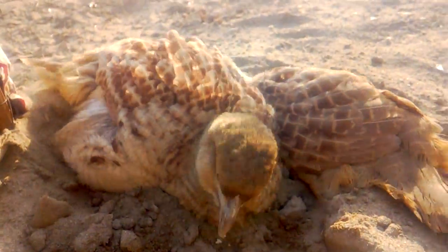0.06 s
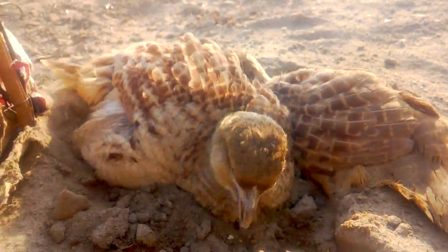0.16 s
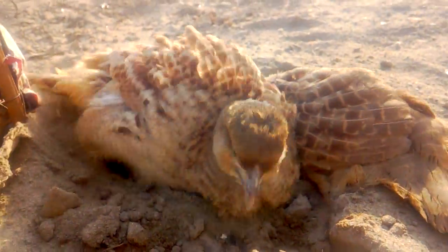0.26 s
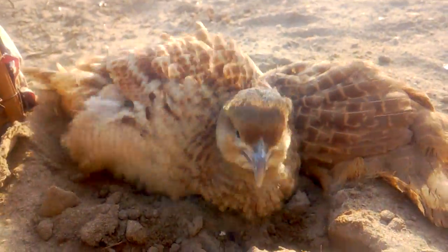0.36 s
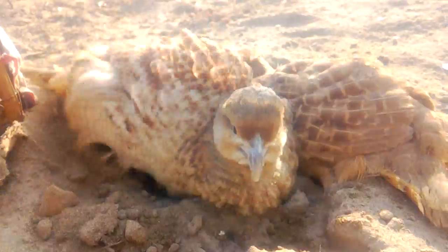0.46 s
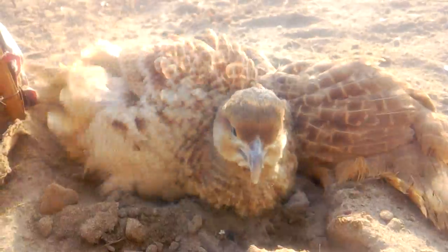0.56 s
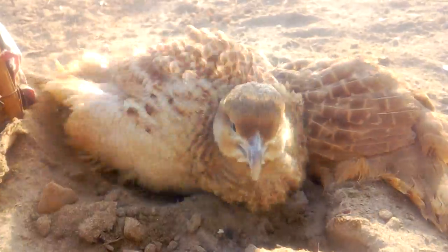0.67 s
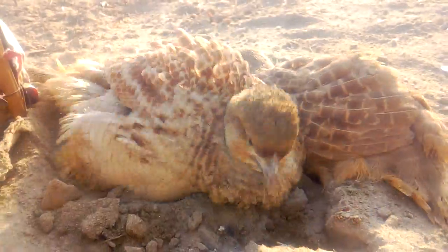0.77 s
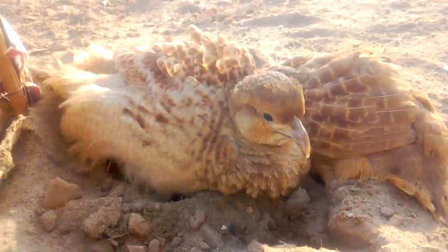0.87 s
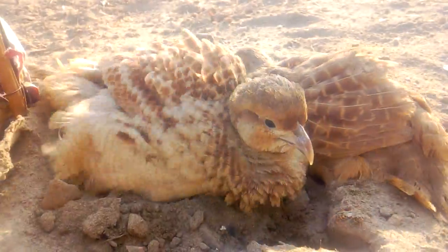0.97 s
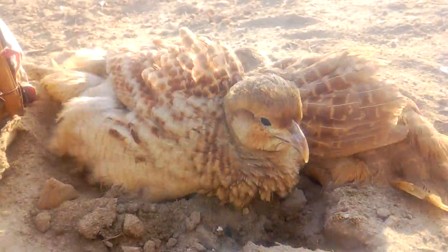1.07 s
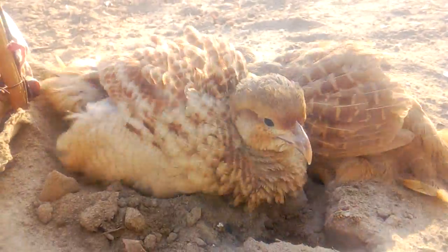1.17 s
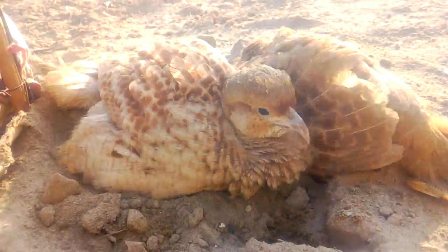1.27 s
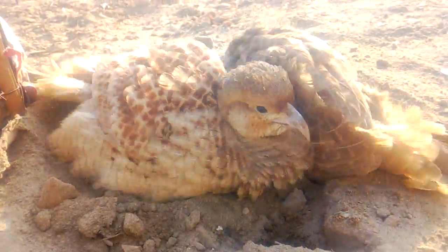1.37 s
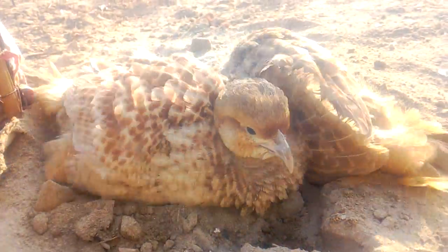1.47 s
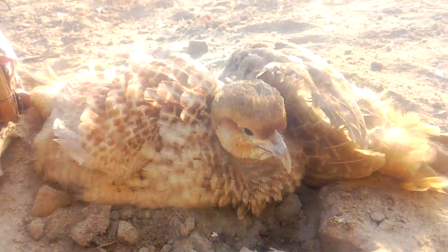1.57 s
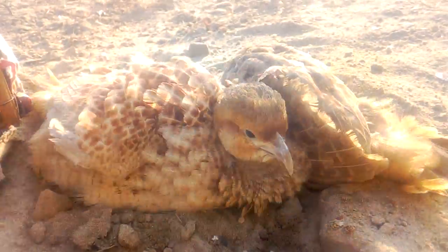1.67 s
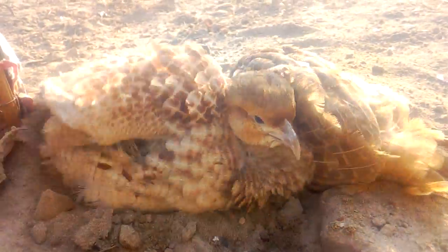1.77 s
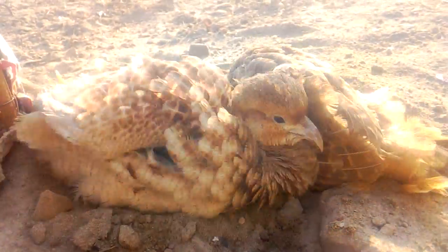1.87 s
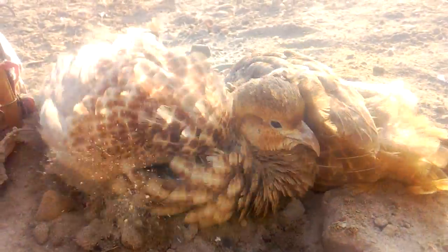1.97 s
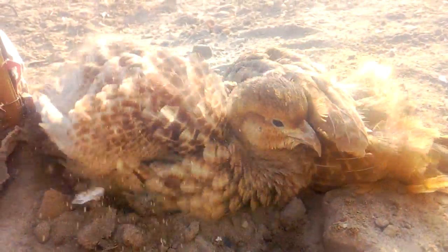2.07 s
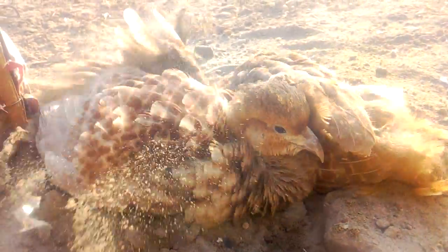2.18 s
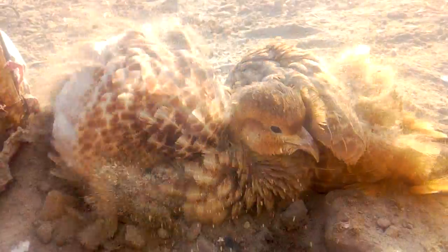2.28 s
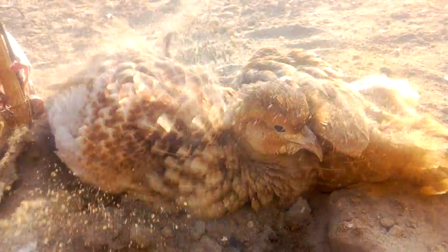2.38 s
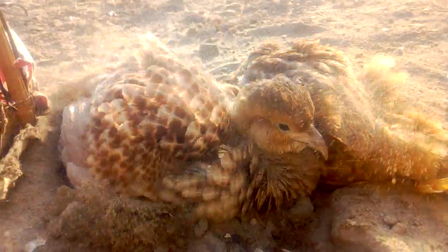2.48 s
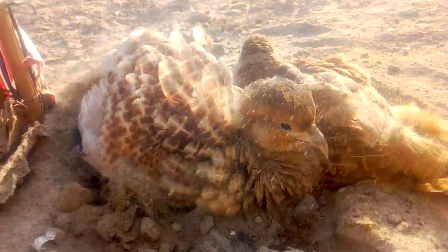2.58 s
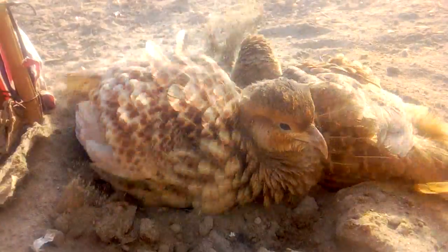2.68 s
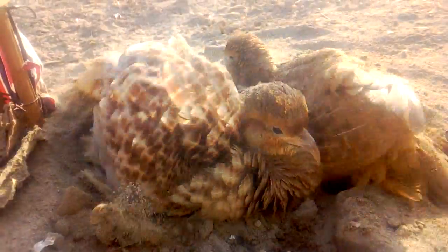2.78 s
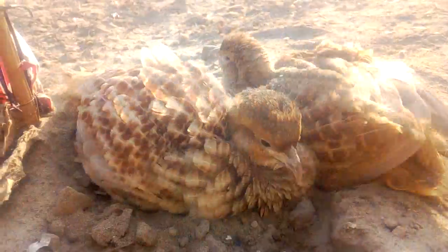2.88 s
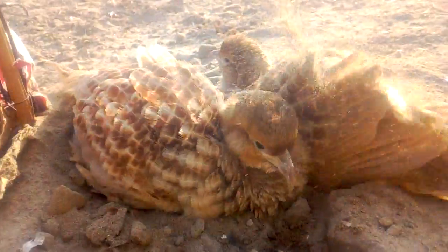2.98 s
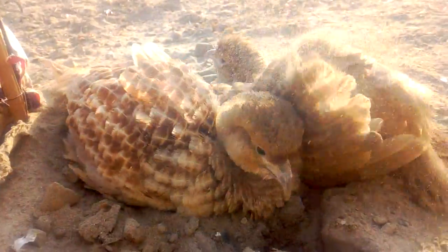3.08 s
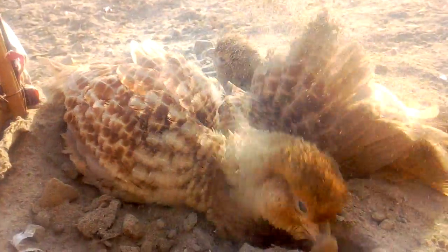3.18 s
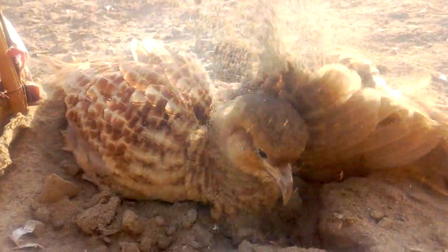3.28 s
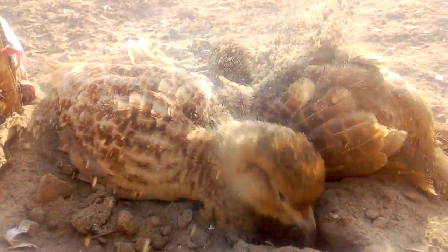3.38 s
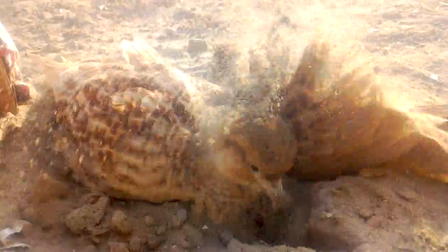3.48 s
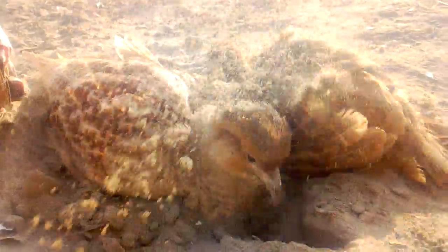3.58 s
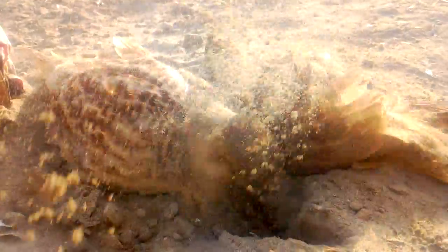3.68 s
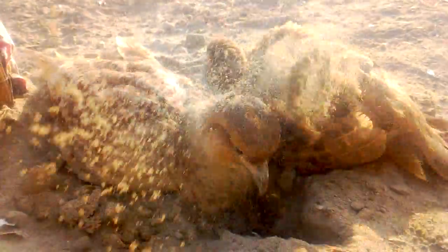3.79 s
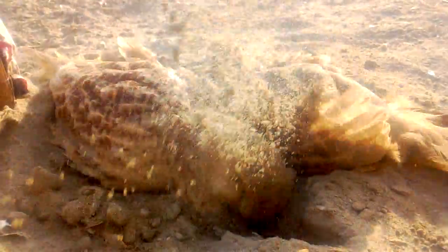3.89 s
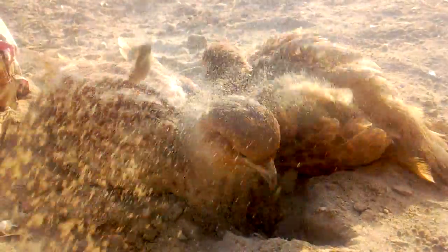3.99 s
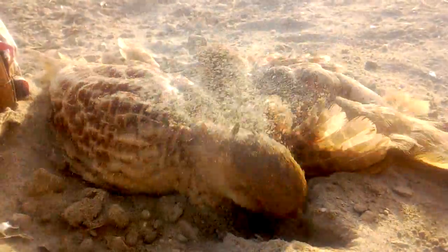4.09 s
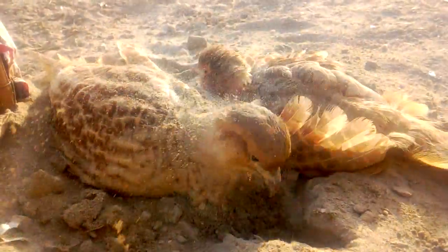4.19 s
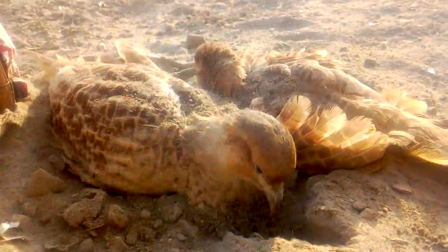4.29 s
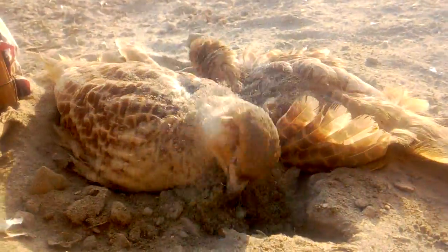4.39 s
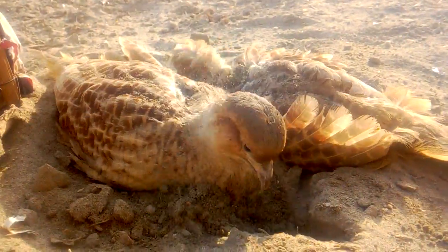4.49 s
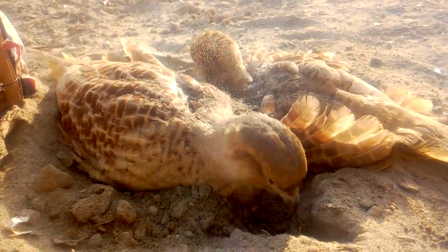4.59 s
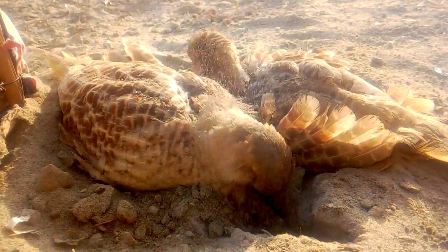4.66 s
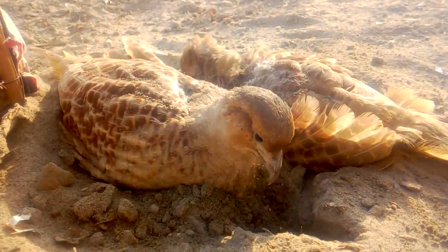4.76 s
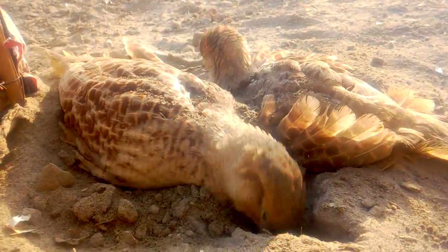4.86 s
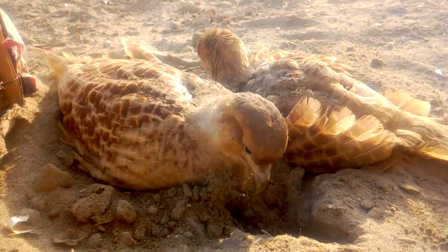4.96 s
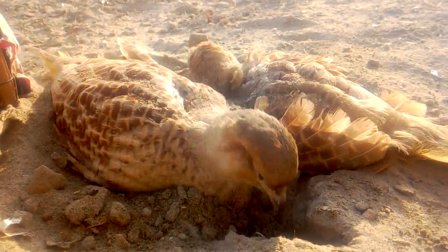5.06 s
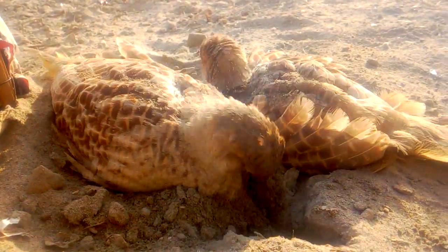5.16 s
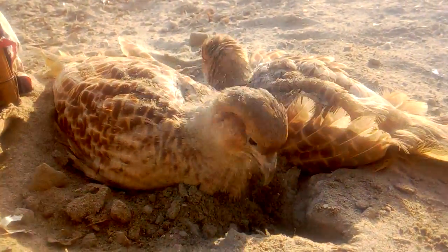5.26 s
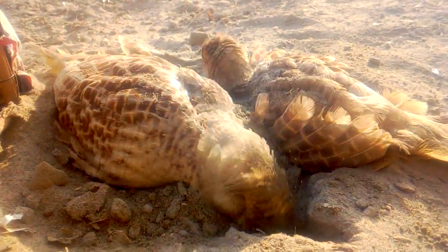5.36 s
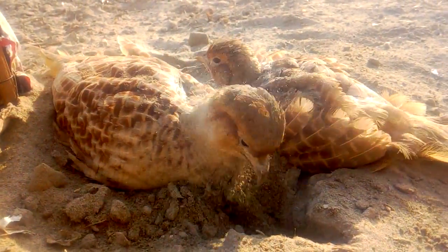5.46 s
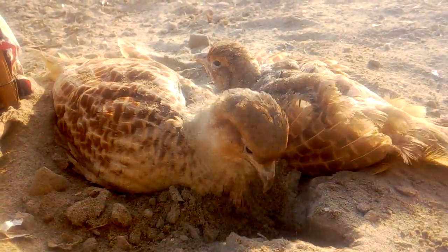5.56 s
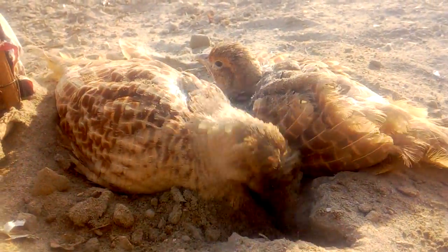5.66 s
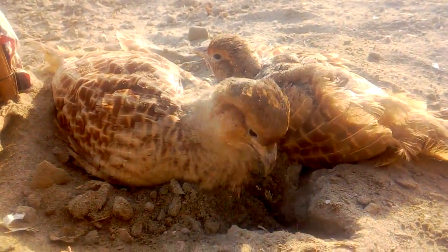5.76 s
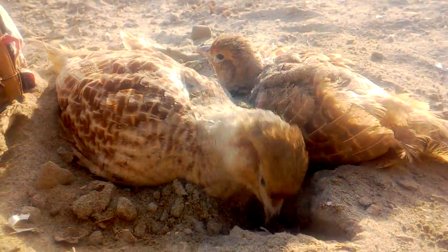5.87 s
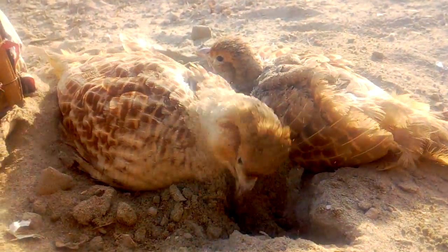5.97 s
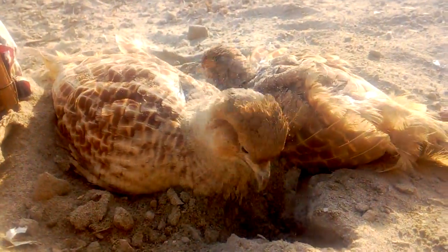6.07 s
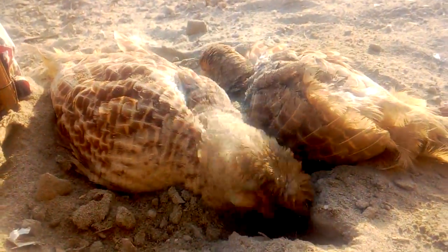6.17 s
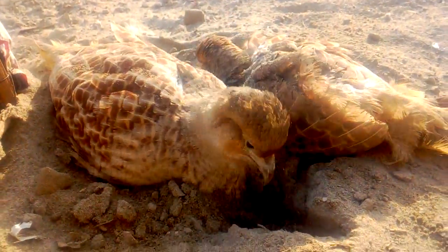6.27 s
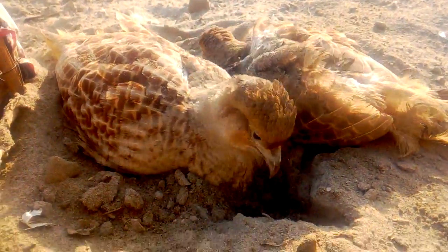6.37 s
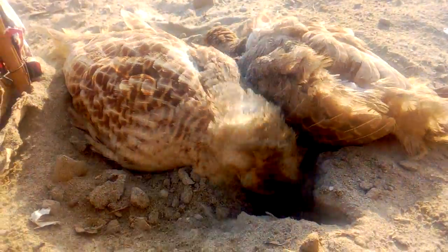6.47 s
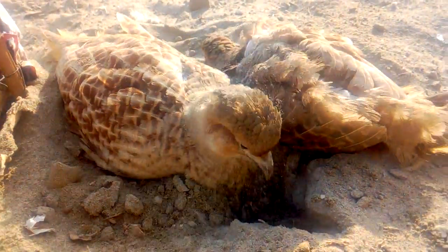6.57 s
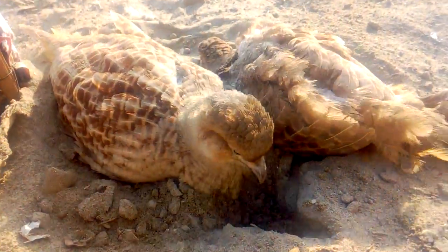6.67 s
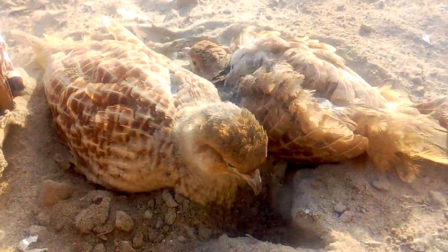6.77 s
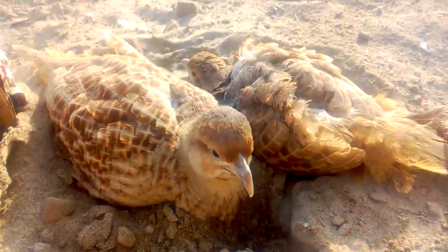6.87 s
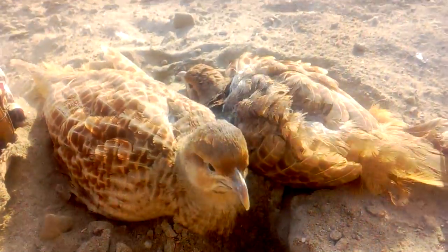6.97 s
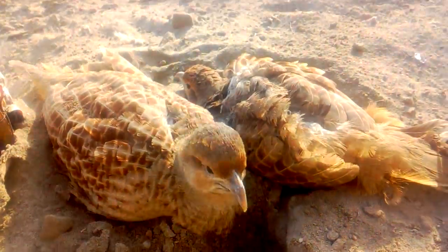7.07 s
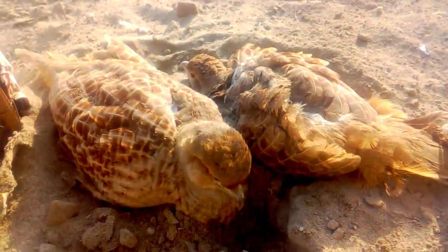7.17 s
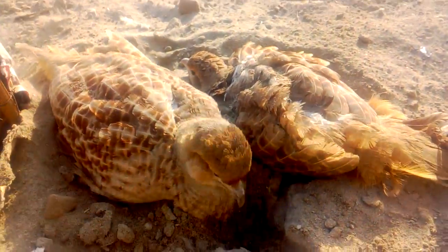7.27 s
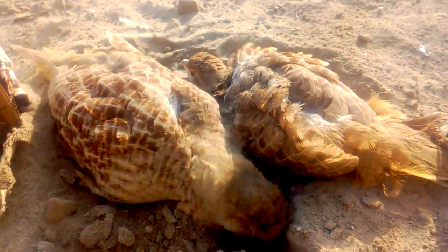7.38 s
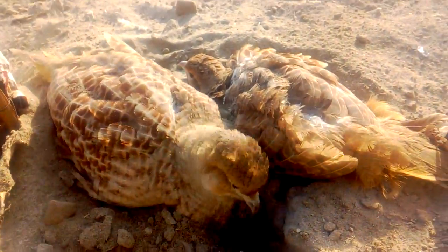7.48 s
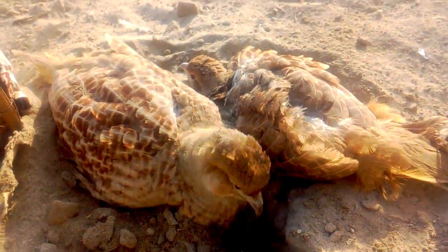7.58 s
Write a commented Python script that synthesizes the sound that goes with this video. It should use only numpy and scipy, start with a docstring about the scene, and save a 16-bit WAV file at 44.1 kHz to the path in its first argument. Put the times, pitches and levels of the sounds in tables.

```python
"""Showers of dry grit run all through: two ground birds bathe in sand close to a small camera.
Wing beats and beak strokes swell a patter of random grain impacts, with plumage rustle and fine dust.
Pebbles ping and ring the microphone port; knocks ring the case in decaying sines with a low boom.
Feathers squeak as shivering overtones, a bird clucks in filtered pulses, and a crow caws far off in
rattling overtones. Low wind rumble and microphone hiss, both shaped noise, lie behind."""
import sys
import numpy as np
from scipy import signal
from scipy.fft import rfft, irfft
from scipy.io import wavfile
from scipy.ndimage import uniform_filter1d

SR = 44100
rng = np.random.default_rng(int(sys.argv[2]) if len(sys.argv) > 2 else 0)


def store_wav(level_fs):
    """Save 16-bit WAV to argv[1]."""
    pcm = np.round(np.clip(np.atleast_2d(level_fs), -1, 1) * 32767)
    wavfile.write(sys.argv[1], SR, pcm.T.astype(np.int16))


N = 336924  # samples

# Wing beats that throw grit close by: [peak t/s, level/dB, swell by 6 dB t/ms]
WING_BEATS = [(0.595, -44.5, 29), (0.668, -50.5, 27), (0.739, -59, 13), (1.205, -47.5, 19),
              (1.241, -48, 12), (1.298, -52.5, 24), (1.349, -54.5, 27), (1.477, -52, 71), (1.644, -56, 76),
              (1.925, -57, 64), (2.055, -52.5, 29), (2.151, -53.5, 61), (2.443, -54.5, 41), (2.52, -55, 55),
              (2.885, -45, 44), (3.082, -43.5, 64), (3.206, -42, 48), (3.341, -33.5, 20), (3.432, -42, 34),
              (3.509, -38, 16), (3.544, -35.5, 10.5), (3.6, -41.5, 30), (3.676, -39.5, 41),
              (3.774, -40, 11.5), (3.869, -40.5, 32), (3.962, -43, 4), (4.107, -46.5, 25),
              (4.418, -58.5, 40), (4.87, -61, 42), (5.472, -57.5, 28), (5.578, -61.5, 26), (6.239, -60, 28),
              (6.387, -36.5, 11.5), (7.243, -51.5, 31)]
# Abrupt beak strokes in the soil, about four a second: [peak t/s, level/dB, fade by 6 dB t/ms]
BEAK_STROKES = [(0.173, -53.5, 14), (0.244, -52, 7), (0.313, -46.5, 11), (0.389, -50, 9.5), (0.472, -51, 8),
                (0.553, -58, 20), (0.835, -45, 6.5), (0.884, -56, 6), (0.971, -50.5, 13),
                (4.002, -40.5, -6), (4.229, -43.5, 36), (4.467, -53.5, 32), (4.753, -51.5, 38),
                (4.997, -52, 47), (5.167, -62, 51), (5.259, -48, 27), (5.318, -56.5, 17), (5.427, -66, 21),
                (5.516, -51.5, 33), (5.783, -48, 20), (5.838, -48.5, 3), (5.86, -53, 19), (6.051, -45, 32),
                (6.312, -51, 39), (6.399, -48.5, 15), (6.589, -52.5, 38), (6.635, -59, 11), (7.21, -68, 14),
                (7.526, -47.5, 22), (7.58, -60, 33)]
STROKE_SWELL_MS, WING_FADE = 5.5, 0.68  # a wing beat fades in this share of its swell
# Falling and stirred sand between the throws: [t/s, steady patter level/dB, plumage rustle level/dB]
SAND = [(0.0, -65, -74.5), (.55, -57, -67.5), (1.0, -59, -68), (1.9, -62.5, -67.5), (2.26, -49, -68.5),
        (2.64, -52.5, -72.5), (2.82, -55.5, -72.5), (3.0, -47, -64), (3.25, -43.5, -61.5),
        (3.74, -45.5, -79), (4.09, -47.5, -97), (4.53, -63, -74), (5.2, -79, -79), (5.96, -65, -69.5),
        (6.41, -67, -62), (6.66, -62.5, -78.5), (7.06, -72, -76.5), (7.64, -71.5, -75.5)]
# Soft grains only ring the port, hard ones click across the whole band: [t/s, softness 0-1]
SOFTNESS = [(0.0, 0.32), (1.9, 0.44), (2.3, 0.22), (3.0, 0.4), (4.4, 0.31), (5.5, 0.59), (6.1, .5),
            (6.4, 0.22), (7.64, .2)]
# Finest dust near the microphone, thick during the big shake: [t/s, level against the grit/dB]
DUST = [(0.0, -31), (1.9, -26), (2.89, -58), (3.0, -20.5), (3.74, -23.5), (3.9, -66), (4.5, -33),
        (7.64, -35.5)]
# Colour of dust and of plumage rustle, before levelling: [f/Hz, level/dB]
DUST_COLOUR = [(5500, -56.5), (7200, 6.5), (8500, -9.5), (10500, -7.5), (13300, -26.5), (15000, -13.0)]
RUSTLE_COLOUR = [(150, -8.5), (350, 4.5), (900, 2.5), (1600, 0), (2600, -3.5), (5000, -44)]
RUSTLE_LUMPS_DB = 2.6  # depth of each of the two drifts in the rustle
THROW_RUSTLE_DB = -27.5  # plumage rustle that comes with each throw of grit, against the grit

# The microphone port rings near 3.8 kHz and shuts out the top: [f/Hz, level/dB]
PORT = [(150, -29), (300, -7.5), (870, -6), (1500, -1), (2000, 0), (2400, 5), (2900, 9), (3750, 15.5),
        (4370, 15), (5160, 5), (6300, 5), (7500, -13), (8500, -25), (10000, -22.5), (13700, -38),
        (14700, -26.5), (15600, -30)]
# Single pebbles landing: [t/s, ping level/dB, f/Hz, contact t/ms]
PEBBLES = [(0.1746, -27, 3960, 0.59), (0.2429, -24, 3870, 0.8), (0.306, -37, 3980, 1.6),
           (0.3113, -26.5, 3970, 0.79), (0.3149, -22.5, 3240, 0.22), (0.3243, -36, 3800, 0.24),
           (0.3424, -28.5, 4470, 0.36), (0.3875, -32, 3880, 0.92), (0.3905, -39, 3630, .59),
           (0.5496, -31.5, 3800, 0.72), (0.5951, -28.5, 3900, 1.9), (0.8323, -27, 3840, 0.74),
           (0.957, -34.5, 3510, .44), (1.0657, -38, 3800, .45), (1.1893, -38, 3580, .7),
           (1.199, -34, 3120, 0.56), (1.451, -32.5, 3220, 0.34), (1.6665, -38.5, 3230, 0.38),
           (2.2066, -29.5, 3700, 0.39), (2.2438, -33, 3760, 0.43), (2.84, -24.5, 3720, 0.58),
           (2.87, -32, 3400, 0.17), (3.0833, -28.5, 3570, .8), (3.3215, -34, 3700, 1.0),
           (3.3283, -22.5, 3470, 0.71), (3.3395, -24, 3260, 0.52), (3.5435, -24, 3560, 1.0),
           (3.547, -21.5, 3370, 0.69), (3.9999, -27.5, 3600, 0.9), (4.1961, -32, 3870, .71),
           (4.2281, -24.5, 3940, 0.76), (4.2328, -29, 3800, 1), (4.4636, -29.5, 3340, 0.38),
           (4.753, -33.5, 3740, 0.82), (4.7672, -38, 3170, 0.55), (4.997, -34, 3720, 1.5),
           (5.2574, -32, 3980, 0.89), (5.2715, -41, 3650, 0.52), (5.424, -48, 3970, 3.0),
           (5.514, -37, 3840, 1.1), (5.5233, -37.5, 3590, 1.9), (5.781, -34.5, 3820, 1.1),
           (5.861, -27, 3220, 0.49), (5.8982, -38, 4800, 0.29), (5.907, -38, 4660, .35),
           (6.0487, -34, 4000, 1.0), (6.0567, -28, 3870, 0.72), (6.0827, -30, 3050, 0.27),
           (6.2187, -40, 3180, .22), (6.2399, -35, 3300, 0.25), (6.3119, -32.5, 3900, .7),
           (6.3443, -38, 4000, .26), (6.357, -31.5, 3480, 0.16), (6.3762, -40, 4500, 0.24),
           (6.385, -16.5, 4460, 0.27), (6.3867, -9, 4830, .2), (6.401, -28, 4090, 0.33),
           (6.5836, -33.5, 4250, 0.77), (6.5943, -35.5, 3900, .9), (6.8055, -48, 4130, .7),
           (7.2023, -44.5, 3670, .36), (7.2196, -40, 4120, 0.47), (7.5223, -31.5, 4200, 0.71),
           (7.5261, -22.5, 4020, 0.44), (7.5308, -32, 3360, 0.85), (7.541, -39, 3520, 1.2)]
# Pebbles after a stroke: longest delay, loudest level over the stroke, middle pitch
SCATTER_S, SCATTER_DB, SCATTER_HZ = 0.037, 1, 3890
CRACK_HZ, CRACK_DB, CRACK_T60 = 15000, -41, .003  # second, faint ring of the port, for a contact of 1 ms

# Knocks that reach the camera case: [t/s, level/dB, f/Hz]
KNOCKS = [(0.3151, -37.5, 940), (0.473, -53, 1300), (0.5491, -49, 1400), (0.5843, -45, 1310),
          (0.612, -43, 875), (0.8322, -42, 1440), (0.9718, -42, 920), (1.1899, -44.5, 1430),
          (1.2062, -39.5, 1320), (1.448, -45.5, 875), (2.206, -50, 597), (2.8404, -40, 1660),
          (3.49, -45, 725), (3.5409, -56, 1000), (4.255, -50, 900), (4.2693, -46.5, 1080),
          (4.405, -46, 990), (5.1706, -47.5, 1060), (5.26, -49.5, 1230), (5.8461, -37.5, 1120),
          (5.861, -30.5, 990), (5.9279, -41.5, 570), (5.9359, -44.5, 950), (5.948, -38.5, 484),
          (6.0814, -41, 930), (6.2185, -49, 1120), (6.2401, -49, 800), (6.2942, -49.5, 980),
          (6.377, -33, 870), (6.385, -10.5, 685), (6.4033, -34, 728), (6.601, -53, 1030),
          (6.6168, -50, 1200)]
# Ringing modes of the case: [multiple of the knock's pitch, level/dB, t60/s]
CASE = [(1.0, 4.5, 0.0061), (.45, -15.5, 0.016), (2.4, -30, 0.0027)]
BOOM_HZ, BOOM_T60, BOOM_DB = 104, .06, -7  # level against the knock
# Faint random knocks while feet scrape near the case: loudest level, base pitch, from and to in seconds
SCUFFLE_DB, SCUFFLE_HZ, SCUFFLE_S = -55, 540, (5.85, 6.36)

# Feather squeaks, one table each:
# [t/s, f/Hz, fundamental level before colour/dB, overtone slope/(dB per octave)]
SQUEAKS = [
    [(.404, 1830, -52, -11), (.415, 1806, -55.5, -9), (.421, 1428, -53.5, -2.5), (.432, 1478, -48, -2.5),
     (.445, 1370, -43, -2), (.450, 1530, -48, -1.5), (.464, 1517, -45.5, -5), (.472, 1360, -55, 3)],
    [(0.684, 1646, -59, -21), (0.697, 1966, -59.5, -12), (0.699, 2006, -63, -7), (0.706, 1966, -61, -12)],
    [(1.455, 1686, -58, -20), (1.471, 1930, -61, -11), (1.491, 1900, -62, -17), (1.505, 2299, -66, -14)],
    [(2.253, 1950, -58, -10), (2.261, 1874, -58.5, -5.5), (2.279, 1751, -53, -9), (2.288, 1760, -60, -1)],
    [(7.249, 1565, -60, -3), (7.259, 1736, -62, 4), (7.268, 1705, -61.5, 2), (7.276, 1305, -51, -3),
     (7.292, 1213, -51, -7), (7.306, 1480, -55, -2.5)],
]
# How the squeak is coloured on its way to the microphone: [f/Hz, level/dB]
SQUEAK_BODY = [(700, -27), (1300, -2.5), (1900, 4.5), (2600, 0.5), (3100, 11), (3700, 20), (4200, 19.5),
               (4600, 5.5), (5300, 0.5), (6100, 6.5), (7000, -39), (9000, -40)]

# A soft cluck: [t/s, pulse rate f/Hz, level/dB]
CLUCK = [(6.838, 334, -45), (6.841, 322, -40), (6.852, 289, -38), (6.857, 285, -41)]
# The closed throat of the cluck: [f/Hz, level/dB]
CLUCK_THROAT = [(150, -30), (320, -2), (640, -1), (950, 1), (1300, 0.5), (1600, -31), (2500, -13),
                (3500, -47)]

# Caws far off: [start t/s, length t/s, effort level/dB, top f/Hz, beak opening as a factor on the throat,
# rise t/s, roughness 0-1, loss of the overtones under 1.4 kHz/(dB per octave)]
CAWS = [(4.268, .262, -48.5, 476, 0.97, 0.02, 0.24, -0.5), (7.565, 0.29, -46.5, 491, 0.92, 0.041, 0.4, 17)]
# The crow's throat: [f/Hz, level/dB]
CROW_THROAT = [(450, -24), (930, -5), (1400, -4.5), (1650, 0), (1850, 5), (2300, 13.5), (2800, -12),
               (3300, -18), (4200, -5.5)]
CAW_SAG, CAW_LEAN = .13, .72  # share of the pitch lost at both ends; under 1 the top comes early
CAW_DROP, CAW_DROP_S = .12, 0.0153  # the pitch breaks downward as the caw ends: share, time
CAW_EDGE_DB, CAW_FALL_S = -13, 0.031  # level lost at both ends, time of the fall
ECHO_DB, ECHO_T60 = -9, 0.13  # the calls come back from the ground and walls nearby

# Low wind rumble, before its lumps: [t/s, level/dB]
GUSTS = [(0.0, -69), (.35, -58), (1.1, -63), (1.4, -57.5), (2.8, -60), (3.35, -57), (4.3, -60.5),
         (5.5, -60.5), (5.6, -57), (5.8, -65.5), (6.0, -55.5), (6.4, -56), (6.6, -61), (7.1, -63),
         (7.25, -58.5), (7.64, -60)]
# Colour of the rumble, before levelling: [f/Hz, level/dB]
RUMBLE = [(15, -36.5), (30, -5), (60, 2.5), (95, -1.5), (170, -9.5), (240, -17.5), (350, -27.5), (700, -48)]
# Colour of the microphone hiss, before levelling: [f/Hz, level/dB]
HISS = [(300, -5.5), (2000, -16), (3800, -17), (5200, -5.5), (7000, -14.5), (9000, -30), (13800, -24.5),
        (14800, -12), (15600, -16)]
HISS_DB, EDGE_HZ = -74, 15700  # hiss level; top of the microphone's band


def sand():
    """Grains hit in clumps that swell with wing and beak; plumage rustles below, dust shares the impacts."""
    s, *levels = np.transpose(SAND)
    t = np.arange(N) / SR
    patter, rustle = (gain_of(np.interp(t, s, db)) for db in levels)
    dust = gain_of(np.interp(t, *np.transpose(DUST)))
    amplitude = np.sqrt(patter ** 2 + throws())

    clumps_db = 2.0 * drift(0.0042) + 0.13 * drift(0.032)
    hits = grains(N, per_s=5000, spread_db=-0.5) * gain_of(clumps_db)
    hard = through_port(amplitude * hits, PORT)
    gentle = through_port(amplitude * hits, [(hz, 2.14 * db) for hz, db in PORT])
    softness = np.clip(np.interp(t, *np.transpose(SOFTNESS)), 0, 1)
    grit = (1 - softness) * hard + softness * gentle

    lumps_db = RUSTLE_LUMPS_DB * (drift(0.021) + drift(0.038))
    rub = grains(N, per_s=1500, spread_db=0.5) * gain_of(lumps_db)
    plumage = evened(shaped(rub, RUSTLE_COLOUR))
    rustle_level = np.sqrt(rustle ** 2 + throws() * gain_of(THROW_RUSTLE_DB) ** 2
                           + (patter * gain_of(THROW_RUSTLE_DB)) ** 2)

    puffs = gain_of(1.0 * drift(.015))  # dust arrives in puffs
    spray = dust * amplitude * evened(shaped(hits, DUST_COLOUR)) * puffs
    return patchy(grit + rustle_level * plumage + spray, patchy_db=1.0)


def throws():
    """Power of the thrown grit: a quick swell at each wing beat or stroke, then stragglers keep falling."""
    power, ms = np.zeros(N), np.arange(-.15, .35, 1 / SR) * 1000
    rows = [(s, db, swell_ms, WING_FADE * swell_ms) for s, db, swell_ms in WING_BEATS]
    rows += [(s, db, STROKE_SWELL_MS, fade_ms) for s, db, fade_ms in BEAK_STROKES]
    for peak_s, db, swell_ms, fade_ms in rows:
        swell = 2 ** -(ms / swell_ms) ** 2
        fade = 1 / (1 + (ms / fade_ms) ** 2)
        add(power, peak_s - .15, gain_of(db) ** 2 * np.where(ms < 0, swell, fade) ** 2)
    return power


def grains(length, per_s, spread_db):
    """Impacts of sand grains: random moments, signs and sizes, at rms 1."""
    size = gain_of(spread_db * np.minimum(rng.exponential(1, length), 4))
    sign = rng.choice([-1., 1.], length)
    return evened(size * sign * (rng.random(length) < per_s / SR))


def through_port(x, points):
    """Rings the microphone port with x, through a response of unit energy."""
    ring = causal(points)
    return signal.oaconvolve(x, ring / np.linalg.norm(ring))[:N]


def patchy(x, patchy_db):
    """Colour drifts in patches of about 700 Hz by 60 ms as the sand comes from different places."""
    z = signal.stft(x, nperseg=256, noverlap=192)[2]
    field = uniform_filter1d(rng.standard_normal(z.shape[::-1]), size=40, axis=0)
    field = evened(uniform_filter1d(field, size=4, axis=1))
    return signal.istft(z * gain_of(patchy_db * field).T, nperseg=256, noverlap=192)[1][:N]


def pebbles():
    """Each pebble gives a short ping; the briefer the contact, the harder the edge that rings the port."""
    out, lead = np.zeros(N), 100  # samples before the peak
    t, port = np.arange(-lead, 300) / SR, causal(PORT)[:300]
    after = t[lead:]
    crack = np.sin(2 * np.pi * CRACK_HZ * after) * gain_of(CRACK_DB - 60 * after / CRACK_T60)
    edge = 0.04 * port / abs(port).max() + crack
    for s, db, hz, ms in [*PEBBLES, *scattered()]:
        width = np.clip(ms, .2, 3) / 1000
        steepness = np.where(t < 0, 2.6, 1.6)
        ping = np.cos(2 * np.pi * hz * t) * 2 ** -(steepness * t / width) ** 2
        ping[lead:] += edge / ms
        add(out, s - lead / SR, -gain_of(db) * ping)
    return out


def scattered():
    """Three small pebbles fall just after the peak of each beak stroke, as rows like the single ones."""
    late, size, pitch, length = rng.random((len(BEAK_STROKES), 3, 4)).T
    s, db, _ = np.transpose(BEAK_STROKES)
    rows = [s + SCATTER_S * late ** 1.7, db + SCATTER_DB - 11.0 * size,
            SCATTER_HZ * (1 + .16 * (pitch - .5)), 1.1 + .8 * length]
    return np.reshape(rows, (4, -1)).T


def knocks():
    """The case rings briefly, then recoils with a low boom."""
    out, t = np.zeros(N), np.arange(5000) / SR
    boom = -np.sin(2 * np.pi * BOOM_HZ * t) * gain_of(BOOM_DB - 60 * t / BOOM_T60)
    for s, db, hz in [*KNOCKS, *scuffle()]:
        ring = sum(gain_of(mode_db - 60 * t / t60) * np.sin(2 * np.pi * multiple * hz * t)
                   for multiple, mode_db, t60 in CASE)
        ring = ring * (1 - np.exp(-t / .00008))  # the blow takes a moment to build
        add(out, s, gain_of(db) * (ring + boom))
    return out


def scuffle(count=30):
    """Faint knocks at random moments, as rows like the single ones."""
    late, size, pitch = rng.random((count, 3)).T
    start, end = SCUFFLE_S
    return np.transpose([start + (end - start) * late, SCUFFLE_DB - 8.0 * size,
                         SCUFFLE_HZ * (.55 + .9 * pitch)])


def squeak(rows, rough=0.11, rasp_db=-13):
    """A stick-slip tone: the pitch shivers, each overtone flutters and rasp fills the gaps."""
    s, *columns = np.transpose(rows)
    t = np.arange(s[0], s[-1], 1 / SR)
    hz, db, slope_db = (np.interp(t, s, c) for c in columns)
    shiver = evened(signal.fftconvolve(rng.standard_normal((5, len(t))), np.hanning(90)[None], "same"))
    turns = np.cumsum(hz * (1 + .009 * shiver[0])) / SR
    tone = 0
    for k in range(1, 5):
        overtone_gain = gain_of(slope_db * np.log2(k) + read(SQUEAK_BODY, k * hz))
        swing = np.sin(2 * np.pi * (k * turns + rng.random()))
        tone = tone + overtone_gain * (1 + rough * shiver[k]) * swing
    rasp = evened(shaped(rng.standard_normal(len(t)), SQUEAK_BODY)) * np.std(tone)
    sound = np.sqrt(2) * gain_of(db) * (tone + gain_of(rasp_db) * rasp)
    return s[0], sound * signal.windows.tukey(len(t), .25)


def cluck():
    """A few pulses through a closed throat that passes mainly the low overtones."""
    s, rate_hz, db = np.transpose(CLUCK)
    t = np.arange(s[0], s[-1], 1 / SR)
    turns = np.cumsum(np.interp(t, s, rate_hz)) / SR
    pulses = np.diff(np.floor(turns + 0.72), prepend=0)
    ring = causal(CLUCK_THROAT)
    return s[0], np.convolve(pulses * gain_of(np.interp(t, s, db)), ring / abs(ring).max())


def caw(start, length, top_db, top_hz, beak, rise_s, rough, thin_db, rattle_hz=72, depth=0.051):
    """A harsh voice on an arch of pitch: it rattles quickly and breath noise blurs each overtone."""
    t = np.arange(0, length, 1 / SR)
    arch = np.sin(np.pi * (t / length) ** CAW_LEAN) ** .8
    drop = CAW_DROP * np.exp((t - length) / CAW_DROP_S)
    hz = top_hz * (1 - CAW_SAG * (1 - arch) - drop)
    effort_db = top_db + CAW_EDGE_DB * (np.exp(-t / rise_s) + np.exp((t - length) / CAW_FALL_S))
    wobble = evened(signal.fftconvolve(rng.standard_normal((10, len(t))), np.hanning(300)[None], "same"))
    rattle = np.sin(2 * np.pi * rattle_hz * t + .5 * uniform_filter1d(wobble[0], size=600))
    rattle = rattle + 0.37 * (2 * rattle ** 2 - 1)  # each swing lingers low and flicks high
    turns = np.cumsum(hz * (1 + depth * rattle)) / SR
    voice = 0
    for k in range(1, 10):
        thinning_db = thin_db * np.minimum(np.log2(k * hz / 1400), 0)
        overtone_gain = gain_of(read(CROW_THROAT, k * hz / beak) + thinning_db)
        voice = voice + overtone_gain * (1 + rough * wobble[k]) * np.cos(2 * np.pi * k * turns)
    return start, gain_of(effort_db) * evened(voice) * signal.windows.tukey(len(t), .06)


def echoed(start, sound):
    """Adds a short diffuse tail of decaying noise to a call."""
    t = np.arange(0, .2, 1 / SR)
    tail = rng.standard_normal(len(t)) * gain_of(-60 * t / ECHO_T60) * (t > .004)
    wet = signal.fftconvolve(sound, gain_of(ECHO_DB) * tail / np.linalg.norm(tail))
    return start, wet + np.pad(sound, (0, len(t) - 1))


def background():
    """A lumpy low rumble of wind, and the steady hiss of the microphone."""
    gusts_db = np.interp(np.arange(N) / SR, *np.transpose(GUSTS))
    gusts_db = gusts_db + 2.0 * drift(0.06) + 2.2 * drift(0.065)
    rumble = evened(shaped(rng.standard_normal(N), RUMBLE)) * gain_of(gusts_db)
    return rumble + gain_of(HISS_DB) * evened(shaped(rng.standard_normal(N), HISS))


def gain_of(db):
    """Decibels to gain."""
    return 10 ** (np.asarray(db) / 20)


def evened(x):
    """Scales to rms 1."""
    return x / np.sqrt(np.mean(x ** 2) + 1e-20)


def read(points, hz):
    """A spectrum table at the frequencies hz."""
    f, value = np.transpose(points)
    return np.interp(np.log(hz + 1), np.log(f + 1), value)


def add(mix, s, sound):
    """Mixes a sound in at s seconds."""
    part = mix[round(s * SR):][:len(sound)]
    part += sound[:len(part)]


def causal(points):
    """Minimum-phase impulse response of a spectrum table."""
    log_gain = np.log(gain_of(read(points, abs(np.fft.fftfreq(4096, 1 / SR)))))
    return np.fft.ifft(np.exp(np.conj(signal.hilbert(log_gain)))).real[:2048]


def shaped(x, points):
    """Filters x by a spectrum table."""
    return irfft(rfft(x) * gain_of(read(points, np.fft.rfftfreq(len(x), 1 / SR))), len(x))


def drift(seconds):
    """Slow chance of rms 1 that changes over about this time."""
    size = max(round(seconds * SR), 2)
    return evened(uniform_filter1d(uniform_filter1d(rng.standard_normal(N), size), size))


def scene():
    """All sources, heard by one microphone."""
    mix = sand() + pebbles() + knocks() + background()
    calls = [echoed(*cluck())] + [echoed(*caw(*row)) for row in CAWS]
    for start, sound in [squeak(rows) for rows in SQUEAKS] + calls:
        add(mix, start, sound)
    return mix[None]


def record(dry):
    """The small capsule loses the deepest bass; then the band limit."""
    thin = signal.sosfilt(signal.butter(2, 55, "highpass", fs=SR, output="sos"), dry)
    band = signal.firwin(511, EDGE_HZ, window=("kaiser", 9), fs=SR)
    return signal.oaconvolve(thin, band[None], "same")


dry = scene()
out = record(dry)
store_wav(out)
```